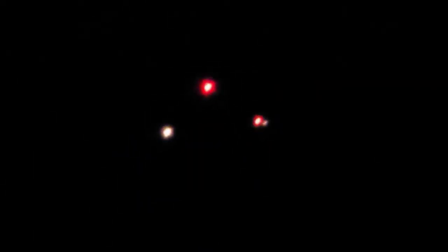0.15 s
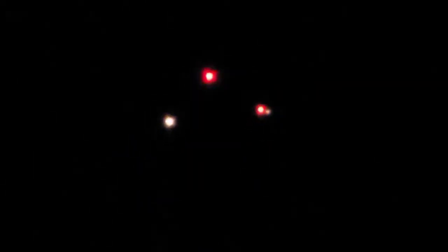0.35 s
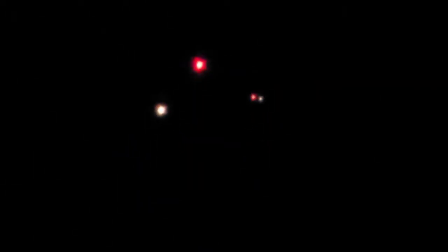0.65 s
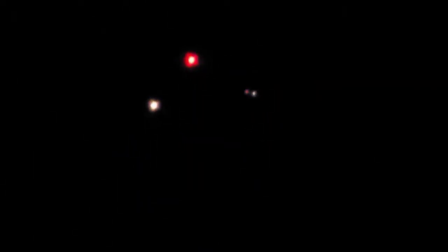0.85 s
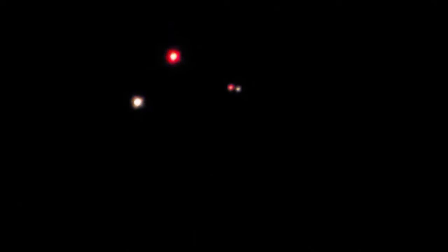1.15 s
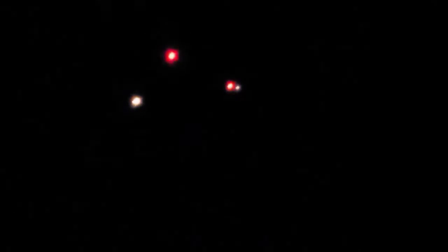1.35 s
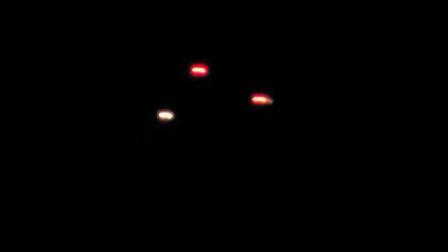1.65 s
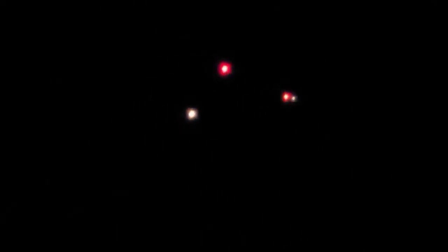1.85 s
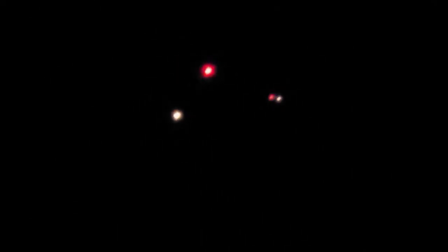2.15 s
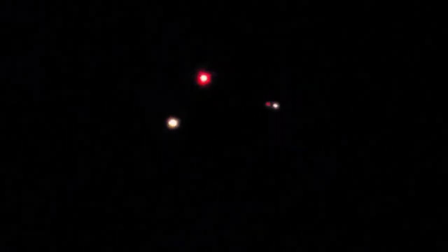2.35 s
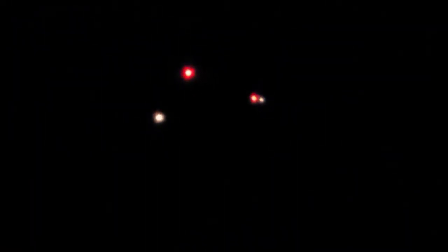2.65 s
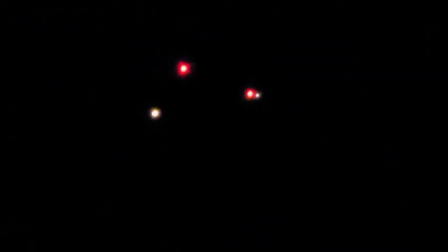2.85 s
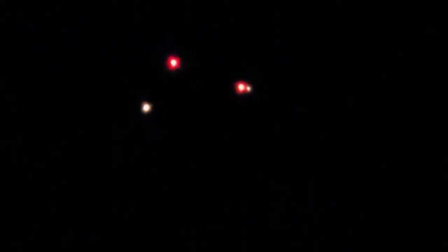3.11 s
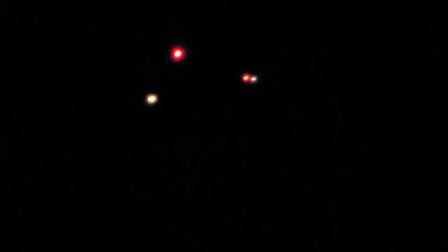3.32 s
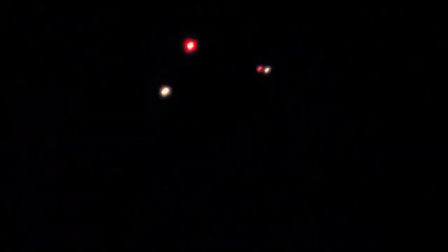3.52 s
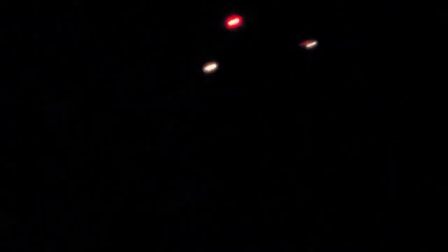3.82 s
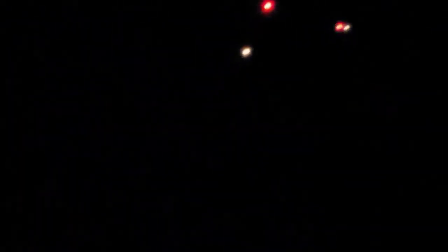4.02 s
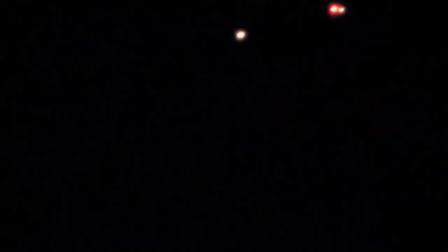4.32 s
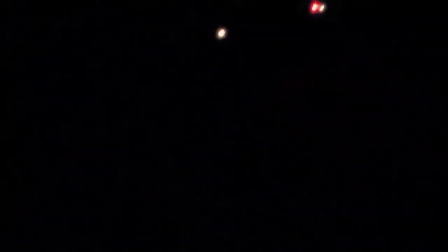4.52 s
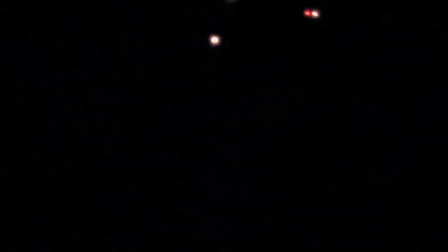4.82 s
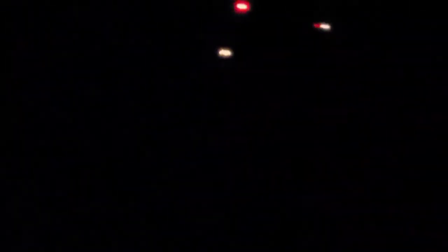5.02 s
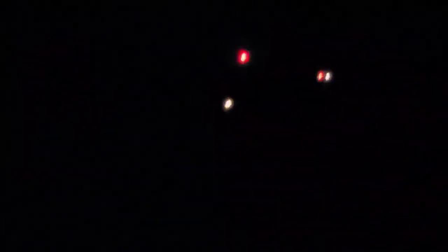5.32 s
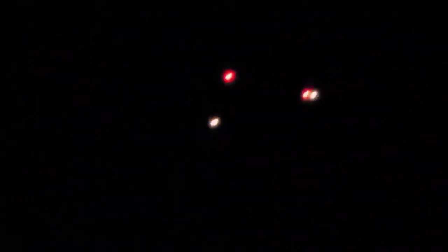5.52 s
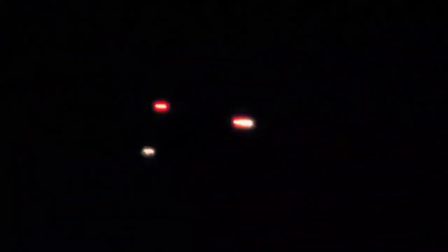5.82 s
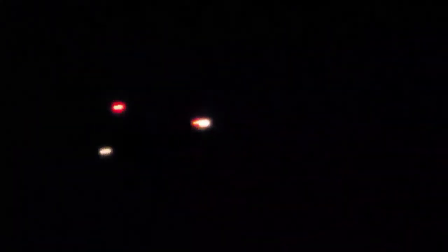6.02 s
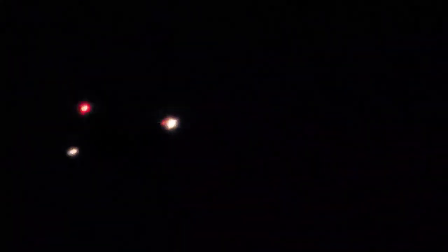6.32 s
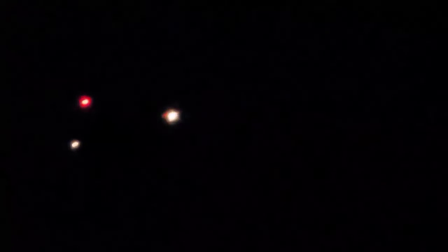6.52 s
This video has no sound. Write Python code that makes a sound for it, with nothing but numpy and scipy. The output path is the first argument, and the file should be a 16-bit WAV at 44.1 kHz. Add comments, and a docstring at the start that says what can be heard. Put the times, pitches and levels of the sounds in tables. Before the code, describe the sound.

Outdoors at night, a distant airliner's blinking lights cross the sky and its broad low roar spreads across the stereo field, wavering and very slowly receding. A low tone near 159 Hz fades in and out, sinking gently; a second glides up around 1.7-2.7 s. Thin airy sizzle is strongest near 1.9 s, with barely audible high whines. Nearby, a V8-like engine idles from 0 to about 5.4 s, a deep uneven loping burble with a slight wall echo. Faint hiss and a thin fan-like hum continue; small ticks come at 4.1 and 4.5 s. At 5.2-5.45 s a tiny brake squeak stutters. A click at 5.55 s coincides with the engine surging, reaching a fuller drone by 6 s. From 5.75 s tyres roll over grit with light rubbing, soft tread rush and crunches, strongest near 6.13 s, until the end at about 6.6 s.

```python
"""An airliner's distant roar hangs over a night outdoors, with a slowly sinking low tone: shaped noise and wavering sines.
Nearby what sounds like a cross-plane V8 idles with a loping burble: engine orders plus pulses ringing the pipes.
Its brake squeaks in short slips, the engine revs up to a drone, and the tyres roll over grit:
gliding sines, then dense cracks, tread rush and a faint rubbing. A fan-like hum, hiss and small ticks complete it."""
import sys
import numpy as np
from scipy import signal
from scipy.fft import rfft, irfft
from scipy.io import wavfile
from scipy.ndimage import map_coordinates

SR = 44100
rng = np.random.default_rng(int(sys.argv[2]) if len(sys.argv) > 2 else 0)


def store_wav(level_fs):
    """Save 16-bit WAV to argv[1]."""
    pcm = np.round(np.clip(np.atleast_2d(level_fs), -1, 1) * 32767)
    wavfile.write(sys.argv[1], SR, pcm.T.astype(np.int16))


N = 293706
TIME_S = np.arange(N) / SR
BIN_HZ = np.arange(N // 2 + 1) * SR / N
SIDES = np.array([[1], [-1]])  # left, right


def undb(db):
    """Decibels to gain."""
    return 10 ** (np.asarray(db) / 20)


def unit_rms(x):
    """Scale to rms 1."""
    return x / np.sqrt(np.mean(x ** 2))


def curves(table):
    """Each column after the first as a line through time."""
    s, *columns = np.transpose(table)
    return [np.interp(TIME_S, s, c) for c in columns]


def over_bins(table):
    """(f/Hz, value) points joined on a log-frequency axis."""
    hz, value = np.transpose(table)
    return np.interp(np.log(BIN_HZ + 1), np.log(hz), value)


def filtered(x, response):
    """Apply a frequency response."""
    return irfft(rfft(x) * response, N)


def resonance(hz, width_hz):
    """Response of one damped mode, gain 1 at its centre."""
    damping = 1j * BIN_HZ * width_hz
    return damping / (hz ** 2 - BIN_HZ ** 2 + damping)


def ringing(x, modes):
    """Modes (f/Hz, width/Hz, level/dB) driven by x, each response squared; overall rms 1."""
    response = sum(undb(db) * resonance(hz, width_hz) ** 2 for hz, width_hz, db in modes)
    return unit_rms(filtered(x, response))


def walk(rate_hz):
    """Smooth random drift of rms 1, low-passed around rate_hz."""
    return unit_rms(filtered(rng.standard_normal(N), np.exp(-(BIN_HZ / rate_hz) ** 2)))


def noise(spectrum):
    """Gaussian noise with the given dB per Hz."""
    return filtered(rng.standard_normal(N), undb(over_bins(spectrum)) * np.sqrt(SR / 2))


def rise(s, edge_s):
    """Smooth step from 0 to 1, about edge_s long, centred on s."""
    return .5 + .5 * np.tanh(2 * (TIME_S - s) / edge_s)


def spell(start_s, end_s, edge_s):
    """Attack, hold and release between two times."""
    return rise(start_s, edge_s) - rise(end_s, edge_s)


def swells(table, edge_s, rest_db):
    """Gain of the rest level and the (start, end, dB) swells, added in power."""
    raised = sum(undb(db) * spell(start_s, end_s, edge_s) for start_s, end_s, db in table)
    return np.hypot(undb(rest_db), raised)


def tone(hz, waver_hz, flutter_db):
    """Distant sine whose pitch and level waver on the way through the air."""
    phase = 2 * np.pi * np.cumsum(hz + waver_hz * walk(8.4)) / SR
    return undb(flutter_db * walk(25)) * np.sqrt(2) * np.sin(phase)


def patchy(x, patch_hz, depth_db, rate_hz, window_samples=1024):
    """Let bands about patch_hz wide drift in level on their own."""
    hz, s, bands = signal.stft(x, SR, nperseg=window_samples)
    chance = rng.standard_normal((window_samples, window_samples))
    places = np.meshgrid(hz / patch_hz, s * rate_hz, indexing="ij")
    drift = map_coordinates(chance, places, mode="mirror")
    return signal.istft(bands * undb(depth_db * drift), SR)[1][..., :N]


# roar spectrum before gain and drift: f/Hz, level/(dB per Hz)
ROAR = [(25, -79), (100, -67.5), (230, -71.5), (280, -73), (350, -72), (440, -73.5), (570, -71),
        (720, -70.5), (820, -72), (970, -77.5), (1200, -79), (1380, -80.5), (1580, -87), (1800, -88.5),
        (2350, -99), (6000, -140)]
# left-right likeness of the roar: f/Hz, correlation
LIKENESS = [(100, 0.82), (260, 0.9), (450, 0.62), (650, 0.44), (820, 0.095), (1050, -0.2), (1500, -0.05),
            (3000, -0.18)]
ROAR_DB, ROAR_DB_PER_S = 0.97, -0.19  # the roar recedes very slowly


def jet_roar(flutter_db=0.5):
    """Jet noise; turbulent air makes each octave, and narrow bands within it, fade on their own."""
    alike = np.clip(over_bins(LIKENESS), -1, 1)
    common = filtered(noise(ROAR), np.sqrt((1 + alike) / 2))
    opposed = filtered(noise(ROAR), np.sqrt((1 - alike) / 2))
    roar = common + SIDES * opposed
    octave = np.clip(np.log2((BIN_HZ + 1) / 100), 0, 6)
    roar = sum(filtered(roar, np.maximum(1 - abs(octave - k), 0)) * undb(flutter_db * walk(7.3))
               for k in range(7))
    return undb(ROAR_DB + ROAR_DB_PER_S * TIME_S) * patchy(roar, patch_hz=109.8, depth_db=1.5, rate_hz=6)


TONE_HZ, TONE_HZ_PER_S = 159.4, -1.35  # Doppler shift
# spells in which the air carries the low tone well, before flutter: start t/s, end t/s, level/dB
TONE_SWELLS = [(-0.1, 0.22, -41), (0.48, 1.0, -42), (1.45, 2.25, -43), (2.68, 2.95, -39.5), (3.1, 3.7, -49),
               (3.95, 5.35, -45)]
TONE_EDGE_S, TONE_REST_DB = 0.052, -51
# second low tone, before flutter: t/s, f/Hz, level/dB
SECOND_TONE = [(1.3, 106.7, -74), (1.7, 110.3, -43.5), (2.15, 116.1, -45.5), (2.48, 117.8, -35.5),
               (2.8, 119, -74)]


def aircraft_tones():
    """One sine sinks with the Doppler shift; a second glides up, swells and fades."""
    sinking_hz = TONE_HZ + TONE_HZ_PER_S * TIME_S
    first_gain = swells(TONE_SWELLS, TONE_EDGE_S, TONE_REST_DB)
    first = first_gain * tone(sinking_hz, waver_hz=0.6, flutter_db=1.84)
    second_hz, second_db = curves(SECOND_TONE)
    return first + undb(second_db) * tone(second_hz, waver_hz=0.75, flutter_db=1.5)


# thin top of the jet noise: peak t/s, level/dB, time to half amplitude/s
SIZZLE = (1.9, -68, 1.9)
SIZZLE_LOW_HZ, SIZZLE_HIGH_HZ = 1600, 4010  # lowest and highest band centres
SIZZLE_TILT_DB = -9  # highest band relative to lowest


def sizzle(flutter_db=5.5, flutter_hz=12, count=20):
    """Top of the jet noise; turbulent air makes each narrow band flutter on its own."""
    peak_s, db, half_s = SIZZLE
    centres, step = np.linspace(SIZZLE_LOW_HZ, SIZZLE_HIGH_HZ, count, retstep=True)
    tilts_db = np.linspace(0, SIZZLE_TILT_DB, count)
    source = rng.standard_normal((2, N))
    bands = 0
    for hz, tilt_db in zip(centres, tilts_db):
        band = filtered(source, np.maximum(1 - abs(BIN_HZ - hz) / step, 0))
        bands = bands + band * undb(tilt_db + flutter_db * walk(flutter_hz))
    return undb(db) * unit_rms(bands) / (1 + ((TIME_S - peak_s) / half_s) ** 2)


# jet fan whine, before fading: start t/s, end t/s, f/Hz, level/dB
WHINE_SWELLS = [(-0.1, 0.397, 2700, -78), (0.95, 1.35, 2690, -83), (3.25, 3.6, 2700, -76)]
WHINE_EDGE_S = 0.15


def whines(waver_hz=22, fading_db=3):
    """Thin jet fan tones, smeared and faded by the air independently on each side."""
    out = 0
    for start_s, end_s, hz, db in WHINE_SWELLS:
        pair = np.array([tone(hz, waver_hz, fading_db) for _ in range(2)])
        out = out + undb(db) * spell(start_s, end_s, WHINE_EDGE_S) * pair
    return out


# firing rate: t/s, f/Hz
SPEED = [(0.3, 47.2), (0.6, 45.3), (1.1, 45.1), (1.3, 43.4), (2.25, 45.8), (2.6, 43.7), (3.0, 47.1),
         (3.5, 47.0), (5.1, 43.7), (5.38, 46), (5.55, 63), (5.68, 67), (5.75, 73), (5.8, 75.8), (5.89, 86),
         (6.02, 90.5), (6.2, 88.9), (6.42, 85.8), (6.66, 87.2)]
IDLE_HZ, REVVED_HZ = 60, 78  # firing rates between which the lope gives way to a drone
# order levels below are before the engine's cut-off, shake and hum gain
# weak orders: multiple of the cycle, level at idle/dB, level when revved/dB
WEAK_ORDERS = [(5, -71, -43.5), (7, -60.5, -40.5), (15, -57, -54.5), (17, -60, -56), (24, -56.5, -58.5),
               (32, -55.5, -65.5), (35, -59, -69)]
# firing note, order 8, before its dip: t/s, level/dB
FIRING_NOTE = [(5.51, -39), (5.58, -23), (5.7, -33.5), (5.755, -15.5), (5.82, -26), (5.91, -23), (6.0, -34),
               (6.17, -27.5), (6.25, -32), (6.46, -23.5), (6.66, -25.5)]
# its octave, order 16: t/s, level/dB
OCTAVE = [(5.62, -57.5), (5.78, -31.5), (6.0, -32.5), (6.3, -32.5), (6.4, -38.5), (6.47, -34.5),
          (6.66, -35)]
# lope, order 11, before throttle and revs: t/s, level/dB
LOPE = [(0, -43.5), (0.35, -44.5), (0.6, -30.5), (1.15, -36), (1.5, -29), (2.8, -31.5), (3.35, -27.5),
        (4.15, -40), (4.9, -29), (5.1, -41.5), (5.5, -43.5)]
LOPE_REVVED_DB = -6
# order 13 throbs against the lope: start t/s, end t/s, level/dB
THROBS = [(0.08, 0.5, -31), (0.6, 0.95, -40.5), (1.3, 2.4, -43), (2.95, 3.7, -39.5), (4.05, 4.98, -31.5)]
THROB_EDGE_S, THROB_REST_DB = 0.14, -46
# the firing note dips before the car moves off: start t/s, end t/s, gain/dB
NOTE_DIP = (5.03, 5.45, -7)
# throttle opening: lope and burble by this gain, rasp by half: start t/s, end t/s, gain/dB
THROTTLE = (5.545, 5.75, 6)
# exhaust resonances, width before squaring: f/Hz, width/Hz, level/dB
EXHAUST = [(51.84, 5.4, -2.5), (69.45, 8.2, -1.5), (98.8, 13, -5.5)]
BURBLE_DB, BURBLE_REVVED_DB = -38.5, 4  # at idle; gain when revved
# higher tailpipe resonances, width before squaring: f/Hz, width/Hz, level/dB
TAILPIPE = [(137.6, 27, -1), (162.2, 30.5, 0.5), (186.1, 16.9, -2.5), (204.8, 14.6, 0), (232.8, 31, -10)]
RASP_DB, RASP_DB_PER_S, RASP_REVVED_DB = -39.5, -1.62, 9  # start; drift; gain when revved
# rougher firing rasps in the tailpipe: start t/s, end t/s, level/dB
RASPS = [(-0.1, 0.2, -37.5), (1.42, 1.8, -39), (2.8, 3.7, -50.5)]
RASP_EDGE_S = 0.14
# the underlying rasp dips as the idle sags: start t/s, end t/s, gain/dB
RASP_DIP = (1.1, 1.24, -10.5)


def engine(start_cycle=.12, shake_db=0.83, hum_db=0.5, cutoff_hz=41, edge_s=0.043):
    """Eight firings a cycle; the unevenly spaced banks add odd orders that beat into a lope."""
    firing_hz, = curves(SPEED)
    revved = np.clip((firing_hz - IDLE_HZ) / (REVVED_HZ - IDLE_HZ), 0, 1)
    note_dip_db, rasp_dip_db, throttle_db = (
        db * spell(start_s, end_s, edge_s) for start_s, end_s, db in (NOTE_DIP, RASP_DIP, THROTTLE))
    cylinders = 8
    cycle = start_cycle + np.cumsum(firing_hz) / cylinders / SR
    note = undb(curves(FIRING_NOTE)[0] + note_dip_db)
    octave = undb(curves(OCTAVE)[0])
    lope = undb(curves(LOPE)[0] + throttle_db + LOPE_REVVED_DB * revved)
    throb = swells(THROBS, THROB_EDGE_S, THROB_REST_DB)
    strong = [(8, note), (11, lope), (13, throb), (16, octave)]
    weak = [(k, undb(idle_db + (high_db - idle_db) * revved)) for k, idle_db, high_db in WEAK_ORDERS]
    hum = 0
    for k, gain in strong + weak:
        # the tailpipe radiates almost nothing below its cut-off
        radiated = 1 / np.sqrt(1 + (cutoff_hz * cylinders / (k * firing_hz)) ** 20)
        shaken = gain * undb(shake_db * walk(3.8))
        hum = hum + radiated * shaken * np.sqrt(2) * np.cos(2 * np.pi * round(k) * cycle)
    # each firing's random departure from the mean rings the pipes
    firing_count = np.floor(cycle * cylinders)
    fired = np.diff(firing_count, prepend=firing_count[0])
    pulses = fired * rng.uniform(-1.14, 1, N) / np.sqrt(firing_hz)
    burble_db = BURBLE_DB + BURBLE_REVVED_DB * revved + throttle_db
    burble = undb(burble_db) * ringing(pulses, EXHAUST)
    rasp_db = RASP_DB + RASP_DB_PER_S * TIME_S + RASP_REVVED_DB * revved + throttle_db / 2 + rasp_dip_db
    rasp = swells(RASPS, RASP_EDGE_S, rasp_db) * ringing(pulses, TAILPIPE)
    return undb(hum_db) * hum + burble + rasp


def car(wall_db=-18, wall_s=0.027):
    """Exhaust straight ahead plus one wall echo, opposite in sign left and right."""
    direct = engine()
    echo = np.interp(TIME_S - wall_s, TIME_S, direct)
    return direct + undb(wall_db) * SIDES * echo


FAN_HZ, FAN_DB, FAN_DB_PER_S = 319.6, -61.5, 1.2


def fan_hum():
    """Thin wavering tone, like a cooling fan, that grows a little clearer."""
    return undb(FAN_DB + FAN_DB_PER_S * TIME_S) * tone(FAN_HZ, waver_hz=2.208, flutter_db=1.0)


# hiss spectrum before swells and flicker: f/Hz, level/(dB per Hz)
HISS = [(1900, -120), (2500, -103), (3100, -101.5), (3800, -107), (4600, -109.5), (5700, -108.5),
        (7000, -115), (7600, -116.5), (8100, -125), (9000, -124), (9900, -129), (11200, -119.5),
        (13000, -122), (15500, -123)]
# lean of its top: f/Hz, left minus right/dB
HISS_LEAN = [(6200, 0.5), (8000, 2.5), (9600, 1), (11300, 6), (15000, 4)]
# swells of its middle band: start t/s, end t/s, gain/dB
HISS_SWELLS = [(-0.1, 0.35, -0.5), (0.6, 0.8, 0.5), (2.58, 3.05, -9)]
HISS_EDGE_S, HISS_REST_DB = 0.093, 0.4
HISS_PATCH_HZ = 448


def hiss(flicker_db=2.0, flicker_hz=7, centre_hz=5500, width_hz=3500):
    """Faint high noise, different on each side; its middle swells and narrow bands flicker."""
    steady = filtered(np.array([noise(HISS), noise(HISS)]), undb(SIDES * over_bins(HISS_LEAN) / 2))
    middle = filtered(steady, np.exp(-((BIN_HZ - centre_hz) / (width_hz / 2)) ** 2))
    swelling = steady + middle * (swells(HISS_SWELLS, HISS_EDGE_S, HISS_REST_DB) - 1)
    return patchy(swelling, HISS_PATCH_HZ, flicker_db, flicker_hz)


# ticks of handling and grit: t/s, f/Hz, width/Hz, ring envelope peak/dB, left minus right/dB
TICKS = [(4.085, 1400, 500, -39.5, 1), (4.088, 5360, 700, -62, 0), (4.148, 4130, 500, -49, -3),
         (4.467, 6000, 700, -63, -4), (5.5553, 4670, 800, -57, 2), (5.556, 3330, 800, -44.5, 4),
         (5.556, 12000, 2200, -54, 3), (5.767, 6860, 800, -60.5, -3), (5.955, 1900, 500, -43.5, -4),
         (6.147, 2300, 900, -49, 1), (6.19, 1900, 700, -45, 4), (6.283, 5070, 1000, -58, -3)]
CRACK_DB, CRACK_S = -16.5, 0.0005  # contact gain relative to the ring's; decay


def ticks():
    """Each contact is a brief noise crack and a very short ring that builds up and dies."""
    out, contact = 0, rng.standard_normal(N)
    for s, hz, width_hz, db, pan_db in TICKS:
        age_s = np.maximum(TIME_S - s, 0)
        fade = np.pi * width_hz * age_s
        ring = fade * np.exp(1 - fade) * np.sin(2 * np.pi * hz * age_s)
        crack = filtered(contact * (age_s > 0) * np.exp(-age_s / CRACK_S), resonance(hz, hz))
        out = out + undb(db + SIDES * pan_db / 2) * (ring + undb(CRACK_DB) * crack)
    return out


# brake pad slips, before chatter: start t/s, end t/s, fundamental level/dB, octave level/dB
SLIPS = [(5.235, 5.266, -72, -69.5), (5.266, 5.291, -68, -72), (5.302, 5.319, -59.5, -69),
         (5.324, 5.353, -63, -65.5), (5.364, 5.392, -65.5, -68), (5.395, 5.418, -69, -77.5),
         (5.44, 5.46, -77, -79)]
SQUEAK_HZ, SLIP_EDGE_S = 2560, 0.009
SQUEAK_SAG_HZ, SQUEAK_SAG_S, SQUEAK_SAG_EDGE_S = 85.3, 5.308, 0.045  # drop; centre; duration
SQUEAK_TWIN_HZ, SQUEAK_TWIN_DB = 5120, -4  # disc mode without the sag, relative to the octave


def brake(waver_ratio=0.0035, chatter_db=3.0, echo_db=-11, echo_t60_s=0.21):
    """The pad slips on its disc: a sagging tone and beating octave, with a different echo each side."""
    sagging_hz = SQUEAK_HZ - SQUEAK_SAG_HZ * rise(SQUEAK_SAG_S, SQUEAK_SAG_EDGE_S)
    phase, twin_phase = (2 * np.pi * np.cumsum(hz * (1 + waver_ratio * walk(153))) / SR
                         for hz in (sagging_hz, SQUEAK_TWIN_HZ))
    fundamental = unit_rms(np.sin(phase))
    octave = unit_rms(np.sin(2 * phase) + undb(SQUEAK_TWIN_DB) * np.sin(twin_phase))
    squeal = 0
    for start_s, end_s, first_db, second_db in SLIPS:
        voice = undb(first_db) * fundamental + undb(second_db) * octave
        squeal = squeal + spell(start_s, end_s, SLIP_EDGE_S) * voice
    squeal = squeal * undb(chatter_db * walk(70))
    echoes = rng.standard_normal((2, N)) * np.exp(-np.log(1000) * TIME_S / echo_t60_s)
    return squeal + undb(echo_db) * filtered(squeal, rfft(unit_rms(echoes) / np.sqrt(N)))


ROLL_S, ROLL_RISE_S = 5.76, 0.092  # the car moves off
# rubbing spells, before chatter: start t/s, end t/s, level/dB
RUBS = [(5.73, 5.85, -58.5), (5.92, 6.02, -62), (6.34, 6.54, -69.5)]
RUB_EDGE_S, RUB_REST_DB = 0.03, -65
# rubbed modes, width before squaring: f/Hz, width/Hz, level/dB
RUB_MODES = [(1860, 130, 0), (3330, 130, -19)]


def rubbing(chatter_db=3.0):
    """Light rubbing, perhaps a pad on its disc, keeps two modes ringing unevenly."""
    gain = swells(RUBS, RUB_EDGE_S, RUB_REST_DB) * undb(chatter_db * walk(40))
    return rise(ROLL_S, ROLL_RISE_S) * gain * ringing(rng.standard_normal((2, N)), RUB_MODES)


# grit colour: f/Hz, relative level/dB
GRIT_COLOUR = [(500, -5), (1400, 7.5), (2000, 2), (2500, -3.5), (3400, -1.5), (4400, -6), (5500, -5.5),
               (7300, -25), (8500, -32.5), (15000, -30)]
GRIT_DB = -72.5  # bed, before unevenness
# crunches over coarser grit, before rise and unevenness: t/s, level/dB, decay/s
CRUNCHES = [(5.82, -67, 0.046), (5.94, -61, 0.04), (6.132, -56, 0.035), (6.178, -62, 0.04),
            (6.228, -67, 0.05), (6.47, -67, 0.036)]
CRUNCH_RISE_S = 0.022


def tyres(grains_per_s=4000, spread_db=3, uneven_db=2.0):
    """Dense tiny cracks of grit under rolling tyres, with crunches that start fast and die away."""
    struck = rng.random((2, N)) < grains_per_s / SR
    sizes_db = spread_db * np.minimum(rng.exponential(size=(2, N)), 4)
    grains = struck * undb(sizes_db) * rng.standard_normal((2, N))
    crunches = 0
    for s, db, decay_s in CRUNCHES:
        decay = np.exp(-np.maximum(TIME_S - s, 0) / decay_s)
        crunches = crunches + undb(db) * rise(s, CRUNCH_RISE_S) * decay
    gain = (undb(GRIT_DB) * rise(ROLL_S, ROLL_RISE_S) + crunches) * undb(uneven_db * walk(35))
    return gain * unit_rms(filtered(grains, undb(over_bins(GRIT_COLOUR))))


TREAD_HZ, TREAD_WIDTH_HZ, TREAD_DB = 1430, 600, -59  # width before squaring
TREAD_S, TREAD_RISE_S = 6.0, 0.4


def tread():
    """Air pumped from the tread rushes in one broad band as the car gathers speed."""
    rush = ringing(rng.standard_normal((2, N)), [(TREAD_HZ, TREAD_WIDTH_HZ, 0)])
    return undb(TREAD_DB) * rise(TREAD_S, TREAD_RISE_S) * rush


def scene():
    """Aircraft above, car nearby, small sounds close by."""
    overhead = jet_roar() + aircraft_tones() + sizzle() + whines()
    vehicle = car() + brake() + rubbing() + tyres() + tread()
    return overhead + vehicle + fan_hum() + hiss() + ticks()


TOP_HZ = 15700


def record(dry):
    """Short linear fade-in, then a steep elliptic low-pass."""
    fade_in = np.minimum(TIME_S / .004, 1)
    low_pass = signal.ellip(10, .1, 80, TOP_HZ, fs=SR, output="sos")
    return signal.sosfilt(low_pass, dry * fade_in)


dry = scene()
out = record(dry)
store_wav(out)
```